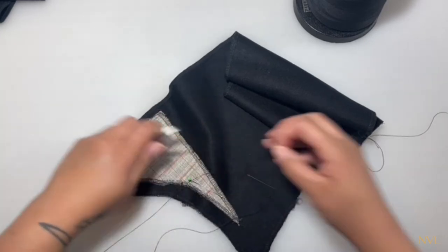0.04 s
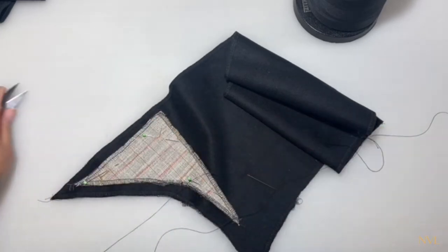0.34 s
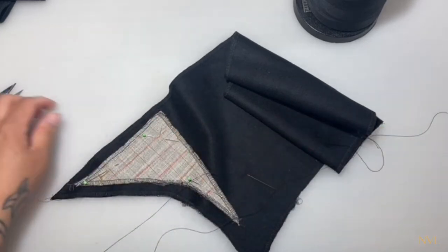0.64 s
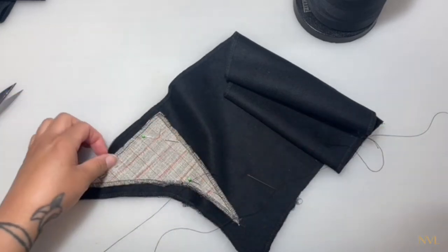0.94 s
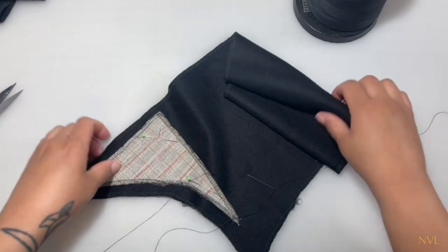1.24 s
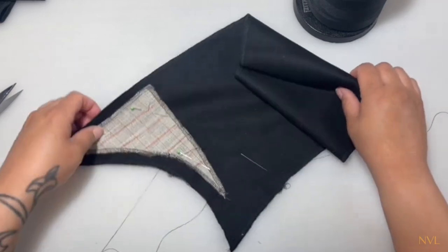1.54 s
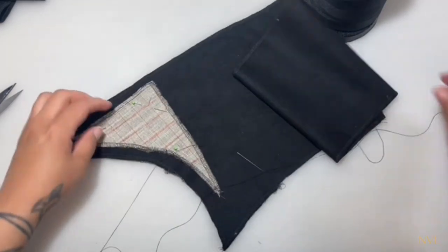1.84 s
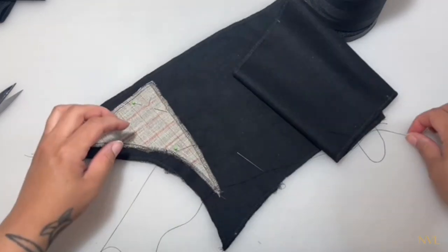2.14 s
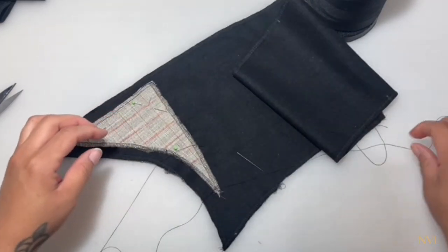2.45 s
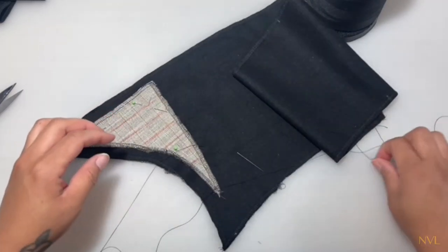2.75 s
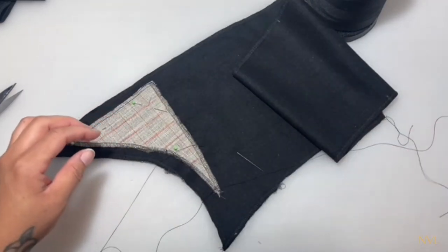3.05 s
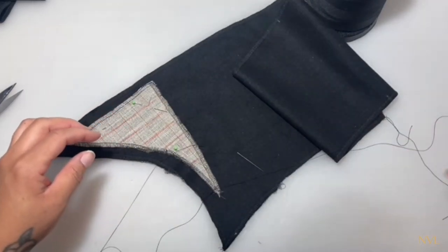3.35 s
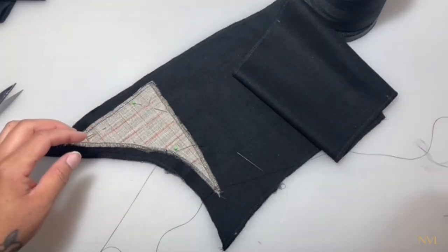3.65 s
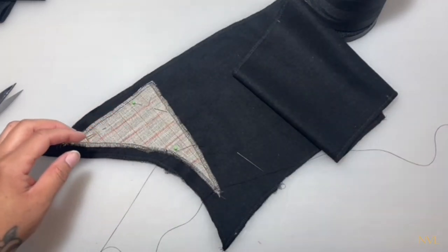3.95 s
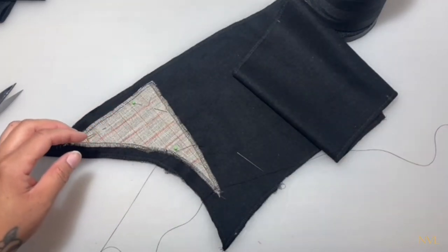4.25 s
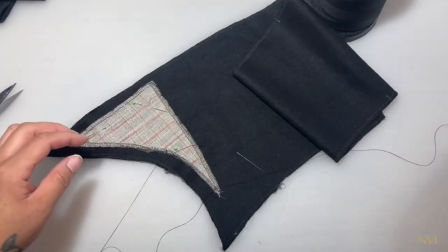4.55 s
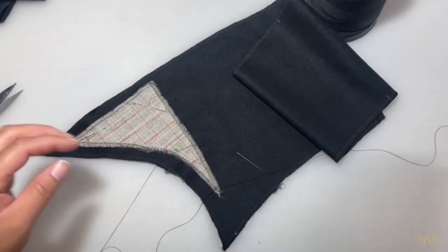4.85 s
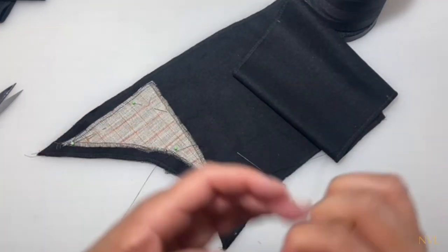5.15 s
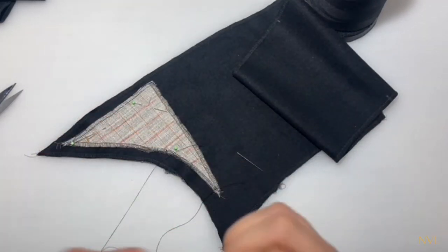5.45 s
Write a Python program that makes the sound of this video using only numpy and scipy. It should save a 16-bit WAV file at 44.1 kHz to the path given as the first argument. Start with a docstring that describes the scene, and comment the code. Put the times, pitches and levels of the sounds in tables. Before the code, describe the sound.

Steel scissors ring briefly after a snip, then are put down on a table with a short skid and a few sharp knocks. Hands brush softly over cloth. A sewing thread is drawn through the fabric in four small, spaced tugs, each a creaky tick and a short rasp, and the cloth swishes twice at the end. A close stereo microphone hears it in a small quiet room with a steady low appliance hum.

```python
"""A small quiet room with a humming appliance; hand sewing at a table, a stereo microphone pair close by.
Steel scissors ring out after a snip and are put down with a skid and a few knocks on the board.
Hands smooth the cloth. A thread is drawn out in small tugs, each a few creaky ticks and a short rasp
as it catches and slips in the weave; then the cloth swishes twice."""
import sys
import numpy as np
from scipy import signal
from scipy.fft import rfft, irfft, next_fast_len
from scipy.io import wavfile
from scipy.ndimage import map_coordinates

SR = 44100
rng = np.random.default_rng(int(sys.argv[2]) if len(sys.argv) > 2 else 0)


def to_wav(s):
    """Save 16-bit WAV."""
    ch = np.atleast_2d(s).T  # columns
    pcm = np.round(np.clip(ch, -1, 1) * 32767)  # PCM
    wavfile.write(sys.argv[1], SR, pcm.astype(np.int16))


N = 251370

# the crack of a sudden contact or release: (frequency [Hz], relative level [dB])
CRACK_SPECTRUM = [(200, 2), (650, 5), (1000, 0), (2000, -3), (4100, -5), (5200, -10), (8000, -13.5),
                  (11500, -12.5), (13100, -55), (15500, -29)]
# the table's heavy frame: (frequency [Hz], level [dB], t60 [s])
FRAME_MODES = [(61, -10.5, 0.12), (89.7, -3.5, 0.15), (129.8, 0, 0.11), (182, 2, 0.057),
               (252.5, 2.5, 0.028)]


def amp(db):
    """Decibels to gain."""
    return 10 ** (np.asarray(db) / 20)


def unit(x):
    """Scale to rms 1."""
    return x / np.sqrt(np.mean(x ** 2) + 1e-20)


def along(points, hz):
    """Read (frequency [Hz], value) points on a log axis."""
    f, v = np.transpose(points)
    return np.interp(np.log(hz + 1), np.log(f + 1), v)


def filtered(x, response):
    """Pass x through a frequency response."""
    n = x.shape[-1]
    m = next_fast_len(n + 8192)
    return irfft(rfft(x, m) * response(np.fft.rfftfreq(m, 1 / SR)), m)[..., :n]


def noise(spectrum, shape):
    """Coloured noise of rms 1."""
    return unit(filtered(rng.standard_normal(shape), lambda hz: amp(along(spectrum, hz))))


def spread(pair):
    """Blend two unrelated signals into sound that reaches the microphones from all around."""
    # likeness of left and right: (frequency [Hz], coherence [ratio])
    coherence = [(100, 1), (350, 0.91), (600, 0.069), (900, 0.045), (1350, 0.48), (1750, 0.98),
                 (2800, 0.35), (4800, 0.34), (6000, 0.97), (7300, 0.91), (9000, 1), (11500, 0.96)]
    turn = lambda hz: np.arccos(np.clip(along(coherence, hz), -1, 1)) / 2
    mid, side = filtered(pair, lambda hz: np.array([np.cos(turn(hz)), np.sin(turn(hz))]))
    return np.array([mid + side, mid - side])


def wobble(rate):
    """A smooth random curve, rate knots a second."""
    return map_coordinates(rng.standard_normal(int(N * rate / SR) + 4), [np.arange(N) * rate / SR])


def fade(t, t60):
    """Exponential decay, 60 dB in t60 seconds."""
    return np.exp(-np.log(1000) * t / t60)


def ring(modes, t, attack):
    """Damped modes, struck at slightly new strengths each time."""
    tones = [(-1) ** k * amp(db + rng.standard_normal()) * fade(t, t60) * np.sin(2 * np.pi * hz * t)
             for k, (hz, db, t60) in enumerate(modes)]
    return sum(tones) * (1 - np.exp(-t / attack))


def arch(t, length):
    """A stroke that swells and dies within its length."""
    return np.sqrt(np.abs(np.sin(np.pi * np.clip(t / length, 0, 1))))


def add(track, s, sound):
    """Mix a sound into the track at time s."""
    part = track[max(round(s * SR), 0):][:len(sound)]
    part += sound[:len(part)]


def room_tone(air_top_hz=3100):
    """A low, slightly unsteady appliance hum; behind it faint higher tones, a soft rush of air and hiss."""
    # the rush and the hiss: (frequency [Hz], relative level [dB])
    air_spectrum = [(15, -35), (28, -8), (52, 4), (88, -6.5), (125, -2.5), (160, -11), (285, -5), (360, -8),
                    (480, -10.5), (950, -18), (1450, -25), (1750, -22.5), (2200, -27.5), (2750, -28)]
    hiss_spectrum = [(2300, -12), (3000, -9.5), (4100, 0.5), (5600, -12.5), (8500, -18), (10200, -11.5),
                     (11500, -18), (12400, -36)]
    # low hum, plus faint higher tones in the room's background:
    # (frequency [Hz], rms level [dB], pitch wander [Hz])
    background_tones = [(58.3, -64.5, 5), (119, -58.5, 1.7), (255.5, -63, 8.7), (285.1, -61, 6.4),
                        (510, -102, 18), (713, -76, 4.8), (1696, -81.5, 6.1), (2720, -82.5, 12)]
    air = filtered(noise(air_spectrum, (2, N)), lambda hz: 1 / np.sqrt(1 + (hz / air_top_hz) ** 16))
    tones = np.zeros(N)
    for hz, db, wander in background_tones:
        peak = amp(db + 0.82 * wobble(4.0)) * np.sqrt(2)
        pitch = hz + wander * wobble(4 * wander)
        tones += peak * np.sin(2 * np.pi * np.cumsum(pitch) / SR)
    return spread(amp(-51.0) * air + amp(-76) * noise(hiss_spectrum, (2, N))) + tones


def blades():
    """The closed blades ring out, with a fading scrape of steel on steel."""
    # the blades after the snip: (frequency [Hz], level [dB], t60 [s])
    blade_modes = [(4100, 4, 0.039), (7630, -5, 0.11), (7870, -6, 0.12), (10727, -12, 0.12),
                   (11400, -11.5, 0.098), (14650, -21, .12)]
    # blade on blade: (frequency [Hz], relative level [dB])
    scrape_spectrum = [(2500, -19.5), (4100, -7), (5300, -9.5), (7900, -3), (9000, -12), (10900, 5),
                       (12800, -36), (14700, -12), (16000, -45)]
    t = np.arange(N) / SR
    ringing = amp(-42.5) * ring(blade_modes, t, attack=0.0006)
    return ringing + amp(-41.5) * noise(scrape_spectrum, N) * fade(t, 0.17)


def cloth(grain_db=0.8, hiss_power=1.88):
    """Fibres brush past each other, hissing more as the hand speeds up; the thread whispers higher up."""
    # hands sliding the cloth, and thin whispers of thread: (time [s], length [s], level [dB])
    strokes = [(0.0, 0.5, -67.5), (0.65, 0.093, -63), (0.676, 0.4, -68.5), (0.9, 0.36, -79),
               (1.2, 0.19, -70.5), (1.217, 0.38, -73), (1.4, 0.4, -83), (4.91, 0.3, -63.5),
               (5.125, 0.56, -64)]
    whispers = [(0.942, 0.019, -66.5), (4.133, 0.047, -72), (4.209, 0.066, -69)]
    # the colour of each: (frequency [Hz], relative level [dB])
    cloth_spectrum = [(100, -38), (400, -36), (1200, -16), (3000, 2.5), (4200, 4), (5900, 4.5), (7200, 3),
                      (9000, 2), (10800, 7.5), (12000, -17), (13000, -38), (14500, -21), (16000, -45)]
    whisper_spectrum = [(3000, -40), (7500, -17), (10000, -1), (11200, -2), (12800, -30), (15000, -27),
                        (16000, -50)]
    t = np.arange(N) / SR
    speed = lambda s, length: arch(t - s, length) ** 2
    slide = np.sqrt(sum((amp(db) * speed(s, length) ** hiss_power) ** 2 for s, length, db in strokes))
    whisper = sum(amp(db) * speed(s, length) for s, length, db in whispers)
    weave = unit(amp(grain_db * wobble(650)))
    hiss = slide * noise(cloth_spectrum, (2, N)) + whisper * noise(whisper_spectrum, (2, N))
    return weave * spread(hiss)


def knocks(steel_t60=0.02, bite_db=4, bite_octaves=0.37, thud_offset_db=-9):
    """Steel cracks and clacks at once, and the table answers; softer bumps sound the table alone."""
    # the scissors' modes, all damped alike by the board: (frequency [Hz], level [dB])
    steel_modes = [(1057, -7.5), (1380, -1.5), (1630, -1), (1840, 1), (2153, -1.5), (2385, -3.5),
                   (2720, -9), (3050, -8), (3600, -7.5), (3980, -8), (4280, -6)]
    # steel meets the table:
    # (time [s], ring [dB], hardness [dB/octave], favoured pitch [Hz], crack [dB], board knock [dB])
    clacks = [(0.2745, -24, -3, 3300, -26, -24.5), (0.3167, -48, -5, 2000, -47, -43),
              (0.447, -58, -2, 1100, -48, -42), (0.456, -47, 2, 1900, -55, -52),
              (0.4818, -25, -3.5, 2000, -23, -32), (0.508, -39.5, -9, 2100, -40, -57),
              (0.5640, -30.5, 6.5, 2000, -24.5, -40), (0.573, -44, 0, 2000, -42, -51),
              (0.675, -51, 5, 4200, -44.5, -63), (0.695, -57, 6, 4200, -49, -62)]
    # handles and hand bump the table: (time [s], board knock [dB], frame thud [dB])
    bumps = [(0.316, -34.5, -67), (0.4458, -32, -51), (0.4580, -28, -55), (0.483, -11, -25),
             (0.5089, -22.5, -65), (0.5230, -29.5, -50), (0.573, -30.5, -40), (0.6760, -37, -41),
             (1.269, -44.5, -49), (2.083, -42.5, -52), (3.427, -39.5, -47.5), (4.613, -46, -58)]
    out, t = np.zeros(N), np.arange(SR // 2) / SR
    for s, clack_db, hardness, bite_hz, crack_db, board_db in clacks:
        # a harder contact reaches the higher modes; the point of contact favours those near one pitch
        bite = lambda hz: bite_db * np.exp(-(np.log2(hz / bite_hz) / bite_octaves) ** 2)
        struck = [(hz, db + hardness * np.log2(hz / 2000) + bite(hz), steel_t60)
                  for hz, db in steel_modes]
        clack = amp(clack_db) * ring(struck, t, attack=0.001)
        burst = fade(t, 0.022) * (1 - np.exp(-t / 0.00016))
        crack = amp(crack_db) * noise(CRACK_SPECTRUM, len(t)) * burst
        add(out, s, clack + crack + table(t, board_db, board_db + thud_offset_db))
    for s, board_db, thud_db in bumps:
        add(out, s, table(t, board_db, thud_db))
    return out


def table(t, board_db, thud_db):
    """The struck board and the heavier frame take a few ms to swing."""
    # the table top: (frequency [Hz], level [dB], t60 [s])
    board_modes = [(278, -8.5, 0.046), (370, -7, 0.059), (420, 5, 0.06), (506, -4.5, 0.045),
                   (607, -7, 0.029), (645, -19, 0.06), (783, -8.5, 0.03)]
    knock = amp(board_db) * ring(board_modes, t, attack=0.0048)
    return knock + amp(thud_db) * ring(FRAME_MODES, t, attack=0.0015)


def palm():
    """The palm rubs over cloth and table in broad, dull strokes."""
    # the strokes: (time [s], length [s], level [dB])
    brushes = [(0.402, 0.17, -52), (0.657, 0.12, -46.5), (0.777, 0.23, -60.5), (1.208, 0.11, -56.5)]
    # the rub: (frequency [Hz], relative level [dB])
    rub_spectrum = [(80, 4.5), (200, 7), (420, 4), (700, -17), (1600, -8), (3000, -19.5), (6500, -21.5),
                    (11000, -55), (12800, -59)]
    t = np.arange(N) / SR
    swell = sum(amp(db) * arch(t - s, length) ** 2 for s, length, db in brushes)
    return swell * noise(rub_spectrum, N)


def skid(start_s=0.445, length_s=0.031, level_db=-38.5, grain_db=2, t60=0.15):
    """The scissors judder along the table top just before they drop."""
    # steel sliding on the board: (frequency [Hz], relative level [dB])
    skid_spectrum = [(250, -14), (500, -5), (700, -7), (1000, -4), (1400, -14), (2300, -22), (3500, -22.5),
                     (6000, -28), (11500, -40), (13000, -70)]
    t = np.maximum(np.arange(N) / SR - start_s, 0)
    judder = unit(amp(grain_db * wobble(400)) * noise(skid_spectrum, N))
    return amp(level_db) * arch(t, length_s) * fade(t, t60) * judder


def tugs(slips_per_s=800, pitch_scatter=0.01, slacken_t60=0.21, top_hz=11500):
    """The thread ticks, the ticks run together into a creak, and tiny slips rasp until it slackens."""
    # the taut cloth and thread: (frequency [Hz], level [dB], t60 [s])
    taut_modes = [(1240, 7, 0.004), (1321, 7.5, 0.02), (1610, -9, 0.011), (2200, -7, 0.022),
                  (3050, -18, 0.015), (5520, -5, 0.0028)]
    # the thread catches and lets go: (time [s], ring [dB], pitch [ratio], snap [dB])
    ticks = [(2.087, -42, 1, -57), (2.1021, -49, 0.82, -69), (2.653, -51, 1.2, -50),
             (2.6563, -39.5, 1.016, -54), (2.664, -49, 1.02, -67), (2.671, -44.5, 1.01, -63),
             (3.4286, -34.5, 1.0, -48), (3.4354, -36.5, 1.05, -56), (3.4433, -42, 1.15, -62),
             (3.451, -49, 0.99, -59), (4.6015, -44.5, 0.992, -42.5)]
    # it slips through the weave: (time [s], length [s], rasp [dB], ringing slips [dB])
    rasps = [(2.1, 0.067, -46.5, -46), (2.659, 0.029, -54.5, -48.5), (3.428, 0.046, -48, -52),
             (4.611, 0.05, -45.5, -44.5)]
    # its friction: (frequency [Hz], relative level [dB])
    rasp_spectrum = [(150, -9), (420, 5), (900, -2.5), (1350, -6), (1750, 4.5), (2250, -1.5), (3000, -9.5),
                     (4200, -10.5), (6300, -13), (8000, -17.5), (11000, -20.5), (12800, -63)]
    out, t = np.zeros(N), np.arange(SR // 2) / SR
    for s, tick_db, pitch_ratio, snap_db in ticks:
        snap = amp(snap_db) * noise(CRACK_SPECTRUM, len(t)) * fade(t, 0.012)
        add(out, s, amp(tick_db) * ring(taut_modes, t * pitch_ratio, attack=0.00023) + snap)
    for s, length, rasp_db, slips_db in rasps:
        slips = (rng.random(len(t)) < slips_per_s / SR) * rng.choice([-1, 1], len(t))
        slip_ring = ring(taut_modes, t * (1 + pitch_scatter * rng.standard_normal()), attack=0.0002)
        grains = unit(signal.fftconvolve(slips, slip_ring)[:len(t)])
        rasp = amp(slips_db) * grains + amp(rasp_db) * noise(rasp_spectrum, len(t))
        add(out, s, rasp * arch(t, length) * fade(t, slacken_t60))
    return filtered(out, lambda hz: 1 / np.sqrt(1 + (hz / top_hz) ** 40))


def presses(contact_s=0.0077):
    """The soft side of the hand leans on the table too slowly to sound more than the frame's low modes."""
    # the hand leans as it pulls: (time [s], level [dB])
    leans = [(2.105, -44), (2.657, -37), (2.679, -39), (4.609, -32.5), (4.624, -33.5), (4.675, -37.5)]
    out, t = np.zeros(N), np.arange(SR // 2) / SR
    push = arch(t, contact_s) ** 4
    for s, db in leans:
        add(out, s, amp(db) * signal.fftconvolve(ring(FRAME_MODES, t, attack=0.001), push / push.sum()))
    return out


def room(x, gap_s=0.00049):
    """The near walls answer after a short gap; each frequency dies at its own speed."""
    # the room's decay: (frequency [Hz], t60 [s])
    decay_times = [(90, 0.5), (250, 1.3), (450, 0.33), (2000, 0.21), (6000, 0.29), (12000, 0.3)]
    # the colour of its answer: (frequency [Hz], gain [dB])
    colour = [(90, -3.5), (200, -9.5), (430, -8), (700, 7.5), (1200, 4.5), (2000, 0.5), (6000, -5),
              (12000, -9.5)]
    hz, t, bands = signal.stft(rng.standard_normal((2, SR * 3 // 4)), SR, nperseg=256)
    tail = signal.istft(bands * fade(t, along(decay_times, hz)[:, None]), SR, nperseg=256)[1]
    tail = spread(filtered(tail / np.linalg.norm(tail[0]), lambda f: amp(along(colour, f))))
    onset = np.clip(np.arange(tail.shape[1]) / SR / gap_s - 1, 0, 1)
    return signal.fftconvolve(x[None], tail * onset, axes=1)[:, :N]


def scene(centred_below_hz=150):
    """Close handling, the thread driest; the board sounds a little from the left, its bass centred."""
    hard = knocks() + skid()
    soft = blades() + palm() + presses()
    thread = tugs()
    # (frequency [Hz], left boost and right cut [dB])
    lean = [(250, 0.11), (400, 0.44), (650, 2.2), (1000, -0.5), (1500, -0.1), (4000, -0.17)]
    lean_db = lambda hz: along(lean, hz) * np.clip(hz / centred_below_hz - 1, 0, 1)
    direct = filtered(hard + soft + thread, lambda hz: amp(np.array([lean_db(hz), -lean_db(hz)])))
    walls = room(amp(-6.0) * hard + amp(-5.5) * soft + amp(-11) * thread)
    return direct + walls + cloth() + room_tone()


def record(dry, low_cut_hz=30, top_hz=15800):
    """A close pair of microphones, the left leading in the treble; deep rumble and the very top are cut."""
    # left ahead of right: (frequency [Hz], phase [rad])
    lead = [(20, 0), (1500, 0), (2700, .7), (4000, 1.1), (4700, 2.4), (5200, 4.7), (6000, 6.28),
            (7500, 7.8), (9100, 9.42), (10600, 10.8), (12200, 12.6), (15800, 14.8)]
    half_lead = lambda hz: np.exp(.5j * along(lead, hz))
    pair = lambda hz: np.array([half_lead(hz), 1 / half_lead(hz)])
    low_cut = lambda hz: (1j * hz / (1j * hz + low_cut_hz)) ** 2
    return filtered(dry, lambda hz: pair(hz) * low_cut(hz) * (hz < top_hz))


dry = scene()
out = record(dry)
to_wav(out)
```